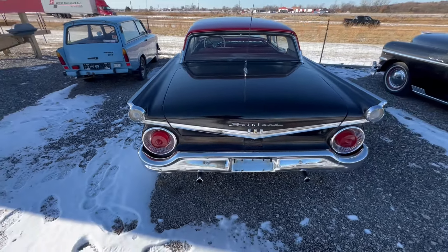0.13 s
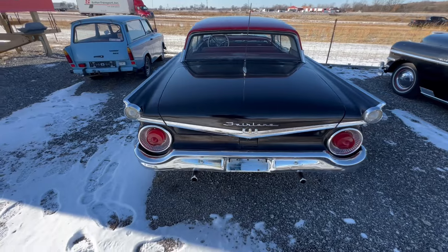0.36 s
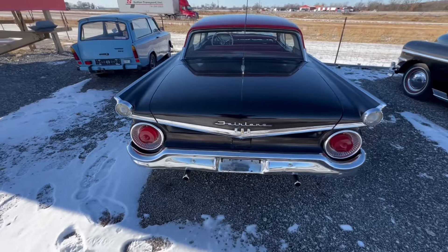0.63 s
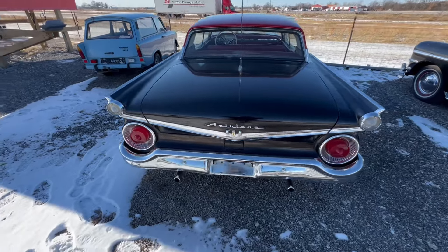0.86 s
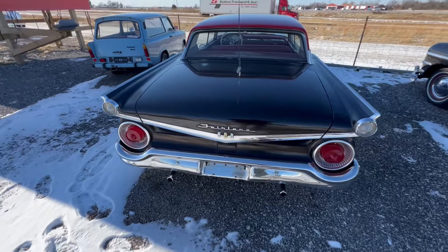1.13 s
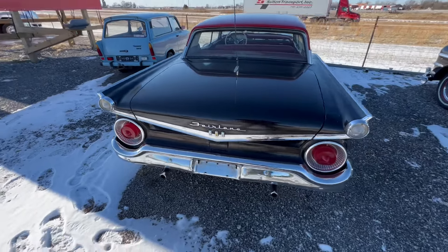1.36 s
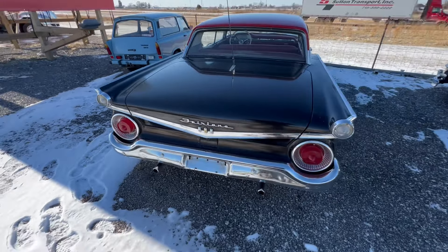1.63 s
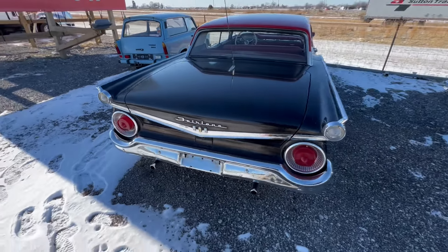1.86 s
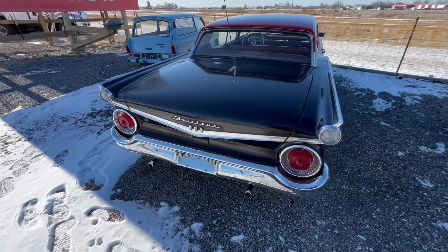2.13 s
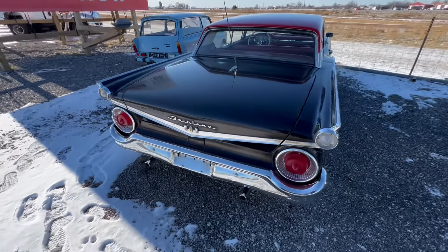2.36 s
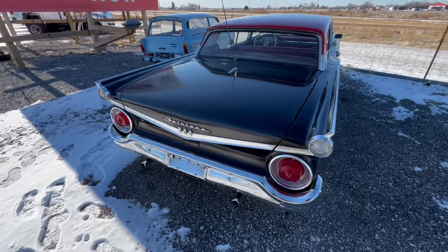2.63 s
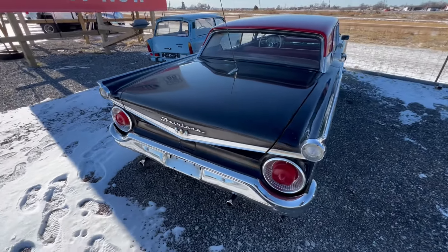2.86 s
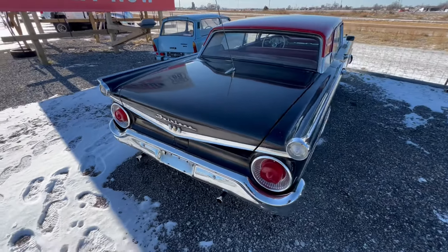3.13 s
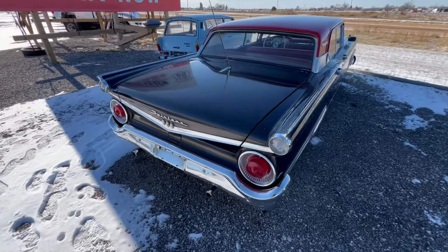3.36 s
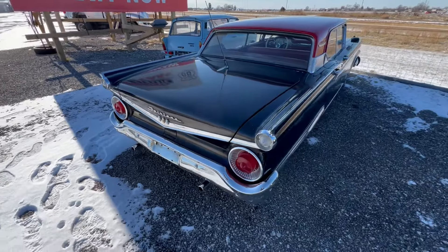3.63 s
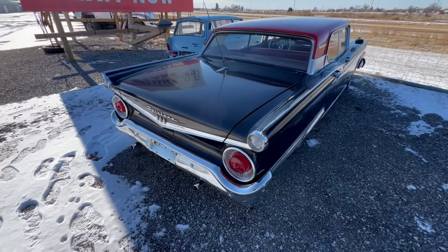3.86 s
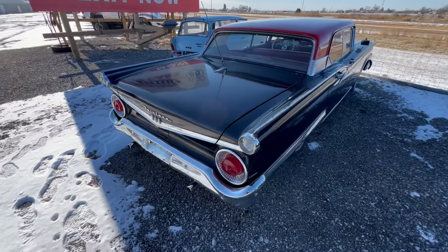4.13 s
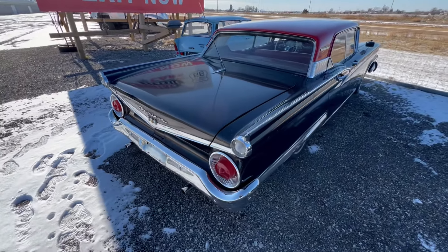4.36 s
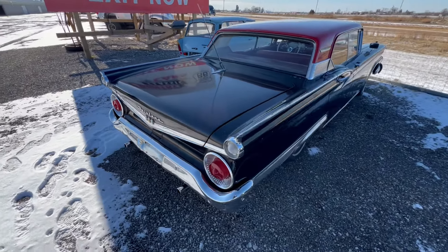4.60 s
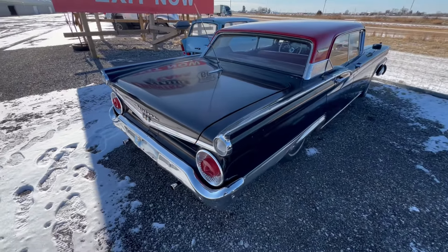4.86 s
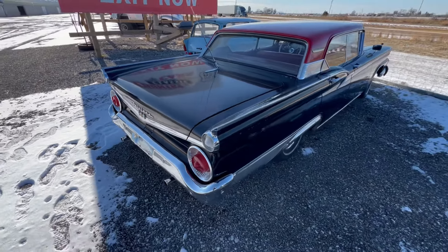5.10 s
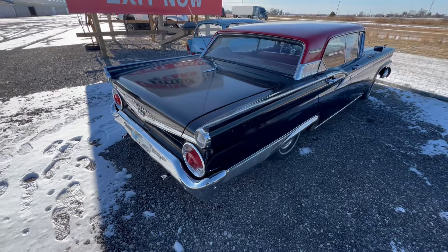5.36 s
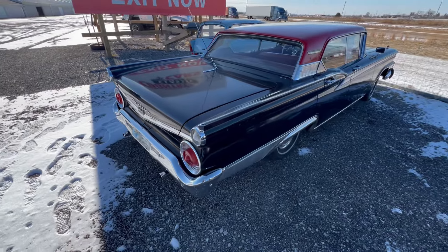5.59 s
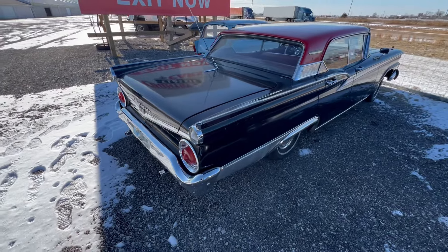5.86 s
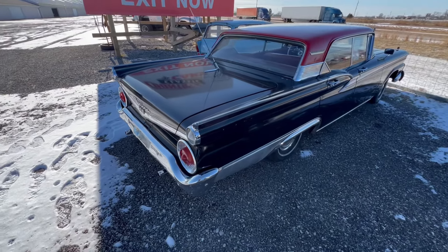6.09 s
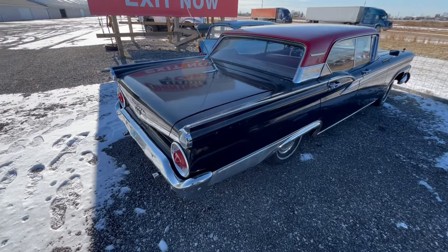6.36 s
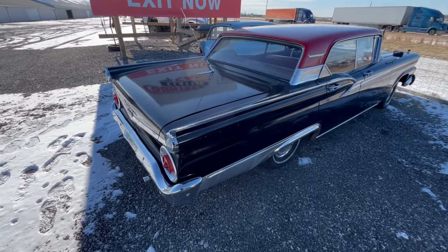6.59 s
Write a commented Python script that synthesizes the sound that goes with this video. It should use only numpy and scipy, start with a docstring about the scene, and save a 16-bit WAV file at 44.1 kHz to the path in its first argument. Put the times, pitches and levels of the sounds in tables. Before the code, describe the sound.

Heavy trucks pass on a nearby highway with droning diesel and swelling tyre roar, while slow footsteps tick and knock on frozen gravel.

```python
"""Trucks passing a snowy gravel yard

Heavy highway trucks cross an open yard, heard at two spaced microphone ports. Engines, exhausts and turbo
are wavering sines; tyre noise and wind are coloured noise. One truck crosses early with a falling exhaust
note and whistle; a six-cylinder diesel drones throughout and comes nearer, its tyres roaring and whining;
a second exhaust joins late. Slow feet tick, knock and scuff on the frozen gravel as short noise and rings."""
import sys
import numpy as np
from scipy import signal
from scipy.fft import rfft, irfft, next_fast_len
from scipy.io import wavfile
from scipy.ndimage import uniform_filter1d, map_coordinates

SR = 44100
rng = np.random.default_rng(int(sys.argv[2]) if len(sys.argv) > 2 else 0)


def amplitude_ratio(level_db):
    """Convert a level in decibels to the matching linear amplitude (field) ratio."""
    exponent = np.asarray(level_db, float) / 20
    return 10 ** exponent


def put_to_file(sound):
    """Save the sound as 16-bit audio at rate SR, in the file named by the first command-line argument."""
    columns = np.atleast_2d(sound).T  # one column per channel
    safe = np.clip(columns, -1, 1)
    whole_steps = np.round(safe * 32767)
    wavfile.write(sys.argv[1], SR, whole_steps.astype(np.int16))


N = 296793
TIME_S = np.arange(N) / SR


def unit(x):
    """Scaled to rms 1."""
    return x / np.sqrt(np.mean(x ** 2) + 1e-20)


def along(points, hz):
    """(Hz, value) points interpolated on a log frequency axis."""
    point_hz, value = np.transpose(points)
    return np.interp(np.log(hz + 1), np.log(point_hz + 1), value)


def curves(rows):
    """One value per sample for each column after the time."""
    s, *columns = np.transpose(rows)
    return [np.interp(TIME_S, s, column) for column in columns]


def wobble(rate_hz):
    """Smooth random curve through rate_hz normal knots a second."""
    at = np.arange(0, N + 8, 8)
    knots = rng.standard_normal(int(N * rate_hz / SR) + 4)
    return np.interp(np.arange(N), at, map_coordinates(knots, [at * rate_hz / SR]))


def swell(peak_s, sigma_s):
    """Gaussian rise and fall, peak 1."""
    return np.exp(-.5 * ((TIME_S - peak_s) / sigma_s) ** 2)


def tone(hz, rms_db, waver_rad):
    """Gliding sine with a wavering phase."""
    phase = 2 * np.pi * (np.cumsum(hz) / SR + rng.random()) + waver_rad
    return np.sqrt(2) * amplitude_ratio(rms_db) * np.sin(phase)


def rush(colour, patchy_db):
    """Noise of rms 1 with a spectral colour and random time-frequency patches."""
    hz, _, z = signal.stft(rng.standard_normal(N), SR, nperseg=2048)
    field = uniform_filter1d(rng.standard_normal(z.shape), size=12, axis=0)
    field = uniform_filter1d(field, size=5, axis=1)
    z = z * amplitude_ratio(along(colour, hz))[:, None] * amplitude_ratio(patchy_db * unit(field))
    return unit(signal.istft(z, nperseg=2048)[1][:N])


def band(centre_hz, half_width_hz):
    """Random-phase noise of rms 1 in one band, 6 dB down at the half-width."""
    m = next_fast_len(N)
    gain = 1 / (1 + ((np.fft.rfftfreq(m, 1 / SR) - centre_hz) / half_width_hz) ** 4)
    return unit(irfft(gain * np.exp(2j * np.pi * rng.random(len(gain))), m)[:N])


# wind colour: (frequency [Hz], relative density [dB])
WIND_COLOUR = [(20, -19), (50, 14), (120, 9.5), (400, -82)]


def breeze():
    """Light wind buffets each port independently, in lumps."""
    return np.array([amplitude_ratio(-41.5 + 6.0 * wobble(3.155)) * rush(WIND_COLOUR, 0) for _ in range(2)])


def scuff():
    """A sole drags through gravel: dense uneven grains under a slow swell."""
    peak_s, half_s, level_db, centre_hz, half_width_hz = 4.7, 0.14, -58, 3740, 1670
    m = next_fast_len(N)
    grains = rng.standard_normal((2, m)) * rng.exponential(size=m) ** 1.8
    hz = np.fft.rfftfreq(m, 1 / SR)
    rasp = unit(irfft(rfft(grains) / (1 + ((hz - centre_hz) / half_width_hz) ** 4), m)[:, :N])
    return amplitude_ratio(level_db) * np.exp(-.5 * ((TIME_S - peak_s) / half_s) ** 4) * rasp


# gravel ticks: (time [s], level before fade [dB], pitch [Hz], left over right [dB])
TICKS = [(2.880, -54.5, 6100, 7), (3.223, -60, 9000, -6), (3.476, -56, 6270, -5), (3.548, -58.5, 8640, -12),
         (3.981, -66, 8600, -15), (4.115, -58.5, 7100, 12), (4.2, -52, 8700, -5.5), (4.656, -44, 3660, 5),
         (4.918, -48.5, 5300, 8), (5.558, -52, 11500, 4)]
# tick colour: (frequency over pitch [ratio], relative density [dB])
GRIT_COLOUR = [(.15, -8), (.5, 8), (.9, 2), (1, 9), (1.15, -1), (1.5, -14), (3, -45)]
# larger stones: (time [s], level before fade [dB], pitch [Hz], left over right [dB])
KNOCKS = [(3.979, -27, 1300, -3), (4.1985, -17, 1250, -7), (4.754, -20, 900, 4), (4.788, -23, 850, 0)]


def gravel():
    """Ticks are short bursts of grit around a pitch; larger stones give dull ringing knocks."""
    length, tick_t60_s, attack_s = 2048, .025, .0005
    out, t = np.zeros((2, N + length)), np.arange(length) / SR
    hz = np.fft.rfftfreq(length, 1 / SR)
    fade = amplitude_ratio(-60 * t / tick_t60_s) * (1 - np.exp(-t / attack_s))
    ratio, gain_db = np.transpose(GRIT_COLOUR)
    for s, db, pitch_hz, pan_db in TICKS:
        colour = amplitude_ratio(along([*zip(ratio * pitch_hz, gain_db)], hz))
        burst = amplitude_ratio(db) * unit(irfft(rfft(rng.standard_normal(length)) * colour)) * fade
        out[:, round(s * SR):][:, :length] += amplitude_ratio([[pan_db / 2], [-pan_db / 2]]) * burst
    for s, db, pitch_hz, pan_db in KNOCKS:
        ring = np.sin(2 * np.pi * pitch_hz * t) * fade ** 4  # decays four times as fast as grit
        out[:, round(s * SR):][:, :length] += amplitude_ratio([[db + pan_db / 2], [db - pan_db / 2]]) * ring
    return out[:, :N]


# approach of the last trucks, also played by diesel(): (time [s], level re close by [dB])
NEARING = [(0, -25.5), (2.9, -17.5), (3.7, -16.5), (4.6, -14.5), (5.4, -1.5), (6.73, 0.5)]
# traffic, only swings about the mean count:
# (time [s], middle level [dB], upper middle over middle [dB], treble level [dB])
ROAD_LEVELS = [(0, -38.5, 3, -50), (0.7, -38.5, 1, -50), (1.05, -40, 1.5, -54), (1.4, -39.5, 2, -51.5),
               (1.8, -37, -0.5, -49), (2.2, -40, -1.5, -56.5), (2.6, -42.5, -4.5, -60),
               (3.0, -44.5, -4, -67), (3.6, -45.5, -3, -68.5), (4.1, -42, -2, -67), (4.5, -41.5, -1.5, -65),
               (4.9, -39, -1, -65), (5.2, -37, -4, -63), (5.5, -38, 0, -57.5), (5.9, -38, 0.5, -58.5),
               (6.3, -34, -2.5, -58.5), (6.7, -32, -5, -53.5)]
# layer colours, low to high: (frequency [Hz], relative density [dB])
RUMBLE = [(20, -30.5), (50, -3), (110, 4), (200, -0.5), (450, -18), (700, -88)]
ROAR = [(250, -29.5), (450, -6), (650, -2), (900, 2), (1050, -0.5), (1200, -7), (1600, -55)]
TREAD = [(900, -38.5), (1200, -0.5), (1400, 1.5), (1650, 0.6), (2000, -2.5), (2500, -9.5), (4000, -23),
         (5500, -40), (9000, -89.5)]
AIR = [(2000, -26), (2800, -4), (3500, 5), (4700, 3), (6500, 1.5), (7600, -3.5), (8500, -48)]
SHEEN = [(6500, -29.5), (8000, 4.5), (9600, 5.5), (10200, -18.5), (11900, -31.5), (12600, -2),
         (14800, -17.5), (16000, -61.5)]
# passing tyre bands: (peak time [s], sigma [s], centre [Hz], half-width [Hz], level [dB])
TYRE_BANDS = [(0.67, 0.32, 966, 130, -39), (0.62, 0.28, 2550, 970, -43.5), (1.19, 0.38, 1430, 83, -48),
              (1.55, 0.21, 570, 45, -42.5), (2.392, 0.23, 1240, 360, -44.5), (6.08, 0.68, 2250, 600, -46.5),
              (1.86, .25, 4700, 530, -57), (6.06, 0.48, 1365, 80, -43), (3.2, .7, 1603, 110, -55),
              (6.81, 0.42, 1570, 330, -31.5)]
# tread-block strikes: (time [s], rate [Hz])
TREAD_RATE = [(3, 115.3), (5.5, 114.6), (6.2, 113.9), (6.73, 113)]
# tread overtones: (multiple of tread rate, peak time [s], sigma [s], level [dB])
TREAD_WHINE = [(5, 5.4, 0.4, -47), (6, 3.8, 0.46, -59), (6, 5.88, 0.7, -48.5), (7, 5.7, .4, -48),
               (7, 6.59, 0.32, -41.5), (10, 5.52, .25, -53), (12, 5.95, 0.29, -46)]


def road():
    """Tyres on asphalt: broadband layers swell with traffic; tread strikes whine as the last trucks near."""
    middle_db, upper_db, treble_db = curves(ROAD_LEVELS)
    near_db, = curves(NEARING)
    tread_hz, = curves(TREAD_RATE)
    # colour, followed level, level [dB], share of swings, share of approach, patchiness [dB]
    layers = [(RUMBLE, middle_db, -33.5, 0.47, 0.1254, 1.64),
              (ROAR, middle_db, -42, 1.12, -0.0625, -0.2),
              (TREAD, middle_db + upper_db, -41, 1.04, 0.1, 0.1),
              (AIR, treble_db, -58, 1.5, 0.25, 1.5),
              (SHEEN, treble_db, -65, 1.47, 0.3, 3)]
    out = np.zeros(N)
    for colour, followed_db, db, swing, approach, patchy_db in layers:
        level_db = db + swing * (followed_db - followed_db.mean()) + approach * near_db
        out += amplitude_ratio(level_db + 0.99 * wobble(2.62)) * rush(colour, patchy_db)
    for peak_s, sigma_s, centre_hz, half_width_hz, db in TYRE_BANDS:
        flutter_db = 2.5 * wobble(45)  # rough asphalt
        out += amplitude_ratio(db + flutter_db) * swell(peak_s, sigma_s) * band(centre_hz, half_width_hz)
    for multiple, peak_s, sigma_s, db in TREAD_WHINE:
        whine = tone(multiple * tread_hz, db + 4 * wobble(6), .9 * wobble(12))
        out += swell(peak_s, sigma_s) * whine
    return out


# second nearing truck's exhaust: (time [s], frequency [Hz], level [dB])
SECOND_EXHAUST = [(5.2, 104, -75), (5.8, 99.06, -43), (6.45, 100.5, -35.5), (6.73, 99.3, -42)]


def second_truck():
    """Rough exhaust note beside the diesel at the end: one wavering sine."""
    hz, db = curves(SECOND_EXHAUST)
    return tone(hz, db + 2 * wobble(6), .5 * wobble(3))


# crossing exhaust: (time [s], frequency [Hz], level [dB], overtone level [dB])
EXHAUST = [(.7, 73, -55, -70), (.95, 72, -32, -62), (1.15, 70, -33, -56), (1.4, 66.5, -38, -46),
           (1.9, 63.5, -38, -46), (2.4, 61.5, -36, -50), (3, 60, -35, -56), (3.4, 59.5, -50, -70)]
# crossing turbo whistle: (time [s], frequency [Hz], level [dB])
TURBO = [(0, 9950, -78), (.6, 9760, -70), (1, 9570, -60), (1.3, 9370, -54), (1.65, 9110, -55),
         (1.95, 8930, -57), (2.15, 8790, -72), (2.8, 8500, -100)]


def crossing_truck():
    """Exhaust note with overtone, turbo whistle and a blurred band above it, all falling in pitch."""
    hz, db, overtone_db = curves(EXHAUST)
    on = (TIME_S > EXHAUST[0][0]) & (TIME_S < EXHAUST[-1][0])
    exhaust = tone(hz, db, .2 * wobble(6)) + tone(2.5 * hz, overtone_db, .3 * wobble(5))
    turbo_hz, turbo_db = curves(TURBO)
    whistle = tone(turbo_hz, turbo_db + 2 * wobble(40), .65 * wobble(120))
    blur = tone(1.56 * turbo_hz, turbo_db - 14.0, 1.6 * wobble(900))  # fast phase waver spreads the line
    return on * exhaust + whistle + blur


# engine cycle, sinking as the truck draws level: (time [s], rate [Hz])
CYCLE = [(0, 13.9), (1.4, 13.91), (2.35, 13.84), (4.37, 13.69), (5.04, 13.57), (5.71, 13.39), (6.73, 13.17)]
# firing note: (time [s], level [dB])
FIRING = [(0.0, -33), (0.71, -32), (1.07, -25), (2.36, -27.5), (2.81, -23), (3.02, -31.5), (3.09, -25.5),
          (4.01, -25.5), (4.25, -34), (4.4, -29.5), (4.82, -32.5), (6.15, -22.5), (6.73, -26.5)]
# other orders: (multiple of cycle, level close by [dB], share of approach)
ORDERS = [(4, -36.5, 0.4), (5, -39, 0.064), (8, -47, 0.12), (10, -42.5, 0.16), (12, -46, 0.19),
          (14, -45, 0.26), (16, -42.5, 1), (18, -55, 0.47), (20, -52, 0.54), (22, -50, 0.97),
          (24, -52.5, 1), (26, -47, 0.84), (28, -51.5, 0.51), (32, -53, 1)]
# brief swells of single orders, added in amplitude:
# (peak time [s], multiple of cycle, sigma [s], level [dB])
ORDER_SWELLS = [(1.083, 5, 0.056, -24), (1.54, 5, 0.48, -40.5), (4.058, 24, 0.34, -45),
                (4.24, 20, 0.11, -49), (3.6, 26, .3, -50), (4.169, 32, 0.25, -54), (4.42, 26, 0.2, -45.5),
                (4.412, 14, 0.14, -44), (4.83, 22, 0.22, -40.5), (4.864, 5, 0.31, -39.5),
                (5.004, 16, 0.34, -40.5), (5.14, 24, 0.18, -41), (5.38, 18, 0.15, -34.5),
                (5.805, 22, 0.78, -48), (6.14, 28, 0.16, -43.5), (6.325, 18, 0.31, -38.5),
                (6.553, 10, 0.19, -34), (6.62, 24, 0.095, -34.5), (6.65, 26, 0.044, -41.5)]


def diesel():
    """Uneven cylinders put lines on orders of the cycle; the firing note is the sixth."""
    cycle_hz, = curves(CYCLE)
    firing_db, = curves(FIRING)
    near_db, = curves(NEARING)
    out = tone(6 * cycle_hz, firing_db + .6 * wobble(5), .07 * wobble(4))
    for order, steady_db, approach in ORDERS:
        swells = sum(amplitude_ratio(db) * swell(peak_s, sigma_s)
                     for peak_s, multiple, sigma_s, db in ORDER_SWELLS if multiple == order)
        level_db = 20 * np.log10(amplitude_ratio(steady_db + approach * near_db) + swells)
        rough = order / 20  # higher orders waver more
        out += tone(order * cycle_hz, level_db + 2.2 * rough * wobble(5), .3 * rough * wobble(5))
    return out


# loudest truck; its bearing jumps when another takes over; the 470 Hz level is low while a ground echo cancels:
# (time [s], bearing [-1 to 1, positive = left leads], left over right [dB], level near 470 Hz [dB])
BEARING = [(0, 0.44, 0.28, -6), (.5, 0.36, 0.63, -2.5), (1.1, 0.16, 1, 2.5), (1.4, -0.47, -1.1, 1),
           (1.8, -0.8, -0.44, -4.5), (2.5, -1, 0.9, 2), (2.504, 0.9, 0.8, 2), (3.199, 0.71, 0.1, 8.5),
           (4.3, 0.7, 0, 7.5), (4.7, 0.54, 1, 7.5), (5.751, 0.034, 0.75, 11), (6.2, -0.41, -0.34, 11),
           (6.45, -0.59, -0.77, 4.5), (6.73, -0.74, .4, 6.5)]
# fixed phase between ports: (frequency [Hz], left lead [rad])
PORT_PHASE = [(90, -.4), (260, -.3), (470, -1.7), (590, -2), (700, .6), (1900, .7), (2100, -.1),
              (2400, -.6), (3400, .1), (5000, 0)]
# fixed port balance: (frequency [Hz], left over right [dB])
PORT_BALANCE = [(60, 2), (110, 0.5), (380, 1), (700, -1.5), (1290, 0.5), (2380, 3), (4400, 7), (8120, -1.5),
                (15000, -4)]
# likeness of the ports: (frequency [Hz], correlation [0 to 1])
PORT_LIKENESS = [(60, .96), (260, .82), (520, .45), (950, .55), (1300, .65), (1700, .5), (2200, .15),
                 (7000, .1), (12000, .2)]


def ports(x):
    """Far sound at two ports: bearing sets a lag from 590 Hz to 11 kHz; late scattered sound differs."""
    side_lag_s = 0.0005  # between ports, for sound from the side
    hz, t, z = signal.stft(x, SR, nperseg=1024, noverlap=768)
    s, bearing, pan_db, echo_db = np.transpose(BEARING)
    z = z * amplitude_ratio(np.outer(np.exp(-((hz - 470) / 110) ** 2), np.interp(t, s, echo_db)))

    lagging_hz = hz * np.clip((hz - 590) / 110, 0, 1) * (hz < 11000)
    lead_rad = np.pi * side_lag_s * np.outer(lagging_hz, np.interp(t, s, bearing))
    lead_rad = lead_rad + along(PORT_PHASE, hz)[:, None] / 2
    turn = np.exp(1j * lead_rad)
    tilt = amplitude_ratio((along(PORT_BALANCE, hz)[:, None] + np.interp(t, s, pan_db)) / 2)

    mix_rad = np.arccos(np.clip(along(PORT_LIKENESS, hz), 0, 1))[:, None] / 2
    scatter = uniform_filter1d(rng.standard_normal((2, *z.shape)), size=3, axis=2)
    scatter = uniform_filter1d(scatter, size=2, axis=1)
    late = np.hstack([z[:, 11:5:-1], z[:, :-6]])  # six frames, about 35 ms
    apart = np.sin(mix_rad) * late * np.exp(1j * np.arctan2(*scatter))
    common = np.cos(mix_rad) * z
    pair = np.array([(common + apart) * turn * tilt, (common - apart) / turn / tilt])
    return signal.istft(pair, SR, nperseg=1024, noverlap=768)[1][:, :N]


def scene():
    """Traffic from afar, wind at the ports, gravel underfoot."""
    traffic = road() + second_truck() + crossing_truck() + diesel()
    return breeze() + scuff() + gravel() + ports(traffic)


def roll_off(x):
    """The treble ends steeply here."""
    return signal.sosfilt(signal.butter(12, 15610, fs=SR, output="sos"), x)


def record(dry):
    """Both ports, left then right, without further level changes."""
    return roll_off(dry)


dry = scene()
out = record(dry)
put_to_file(out)
```